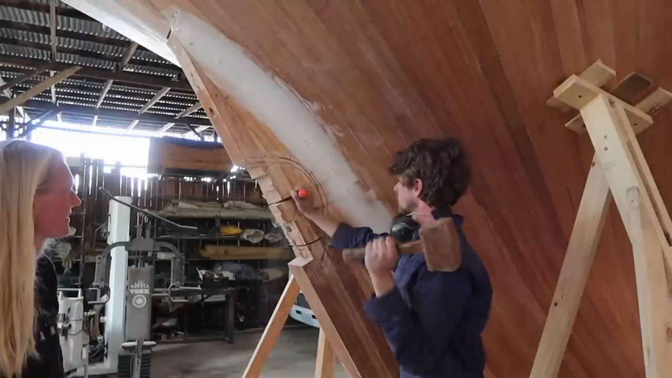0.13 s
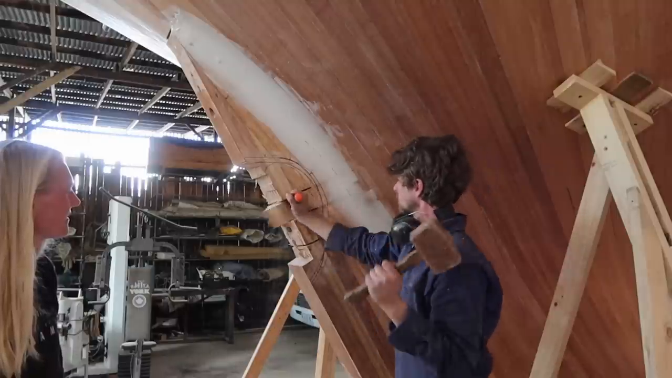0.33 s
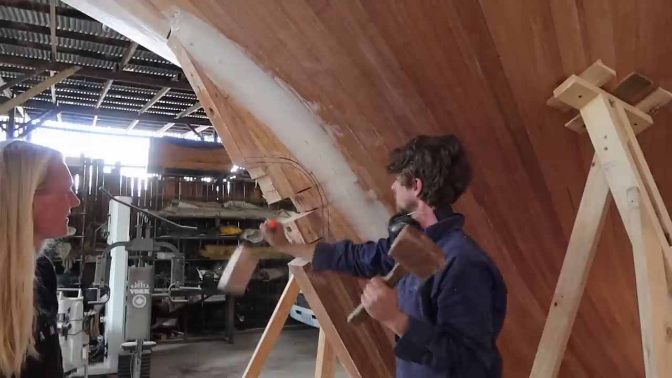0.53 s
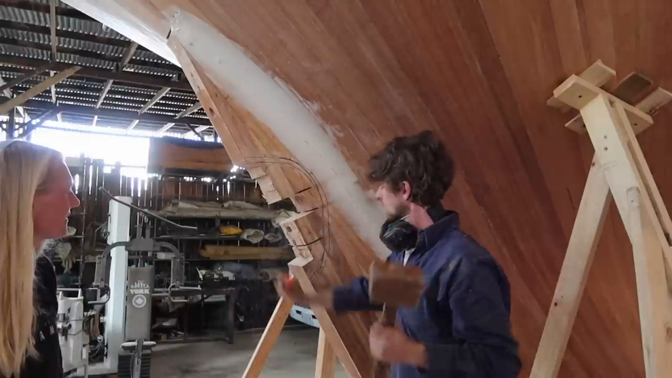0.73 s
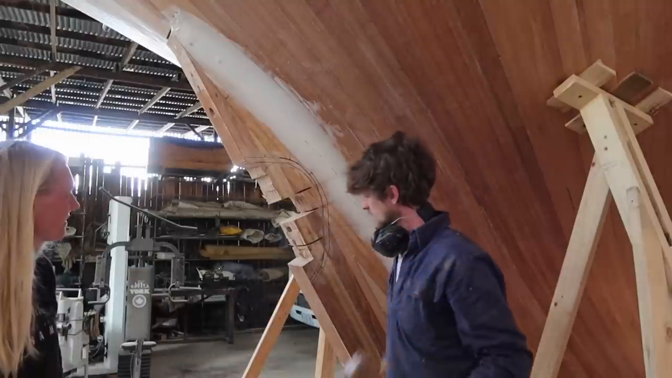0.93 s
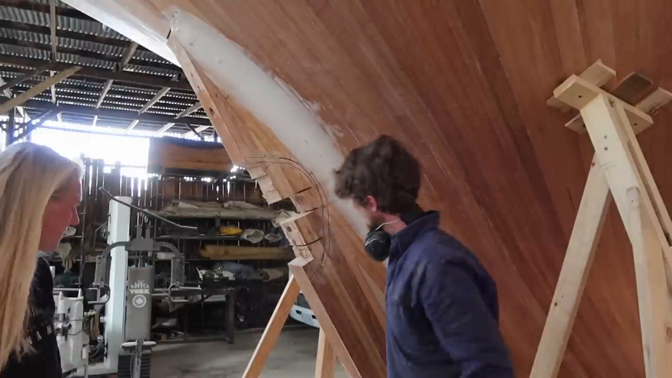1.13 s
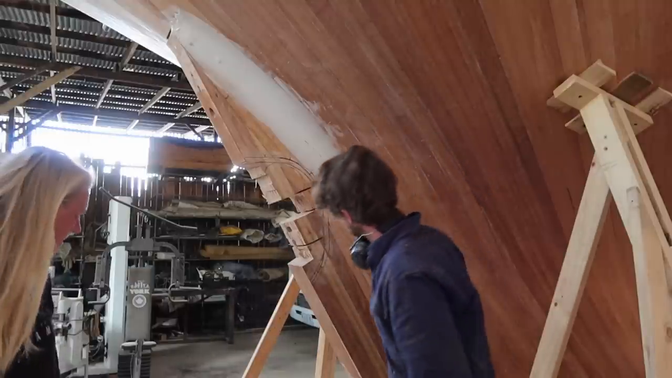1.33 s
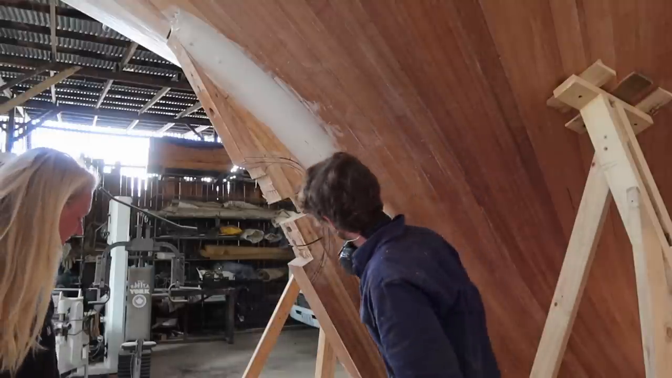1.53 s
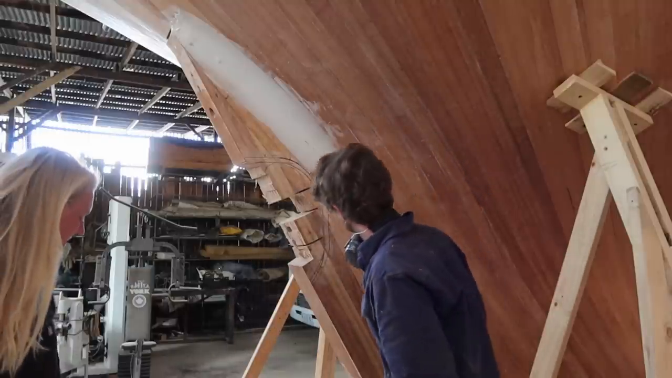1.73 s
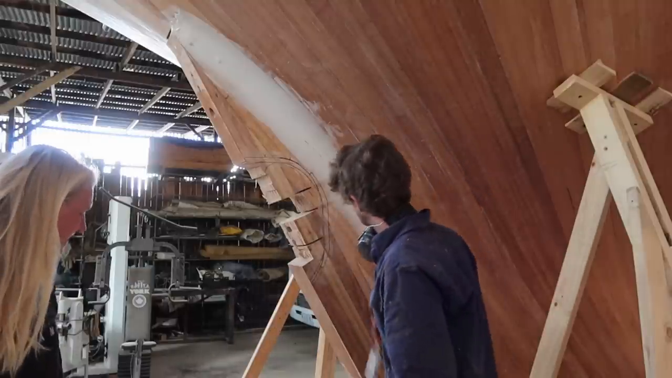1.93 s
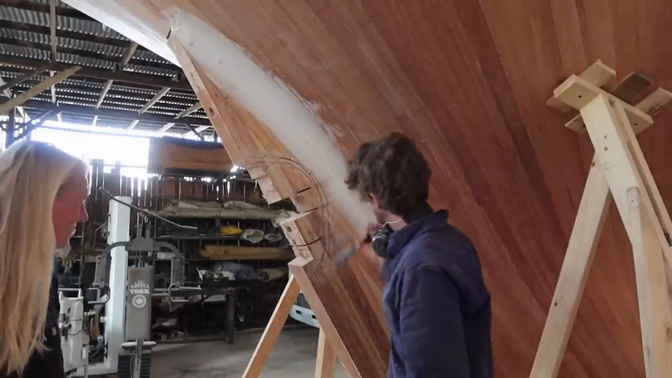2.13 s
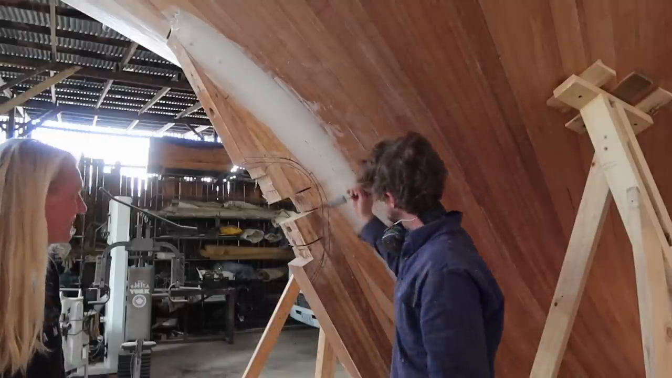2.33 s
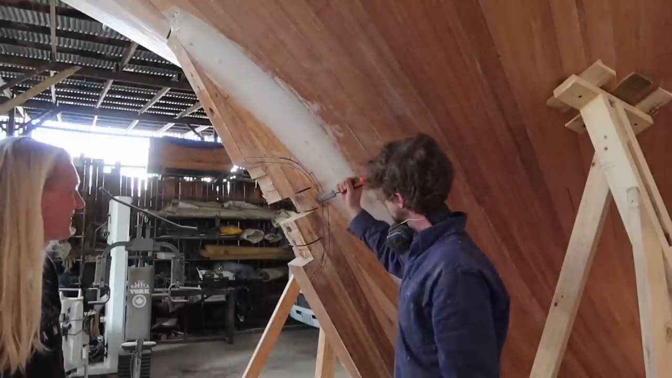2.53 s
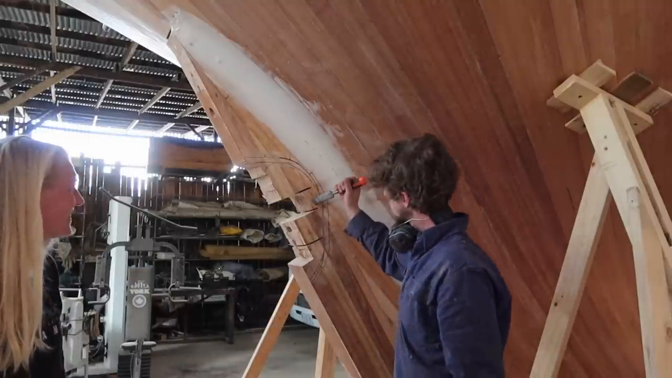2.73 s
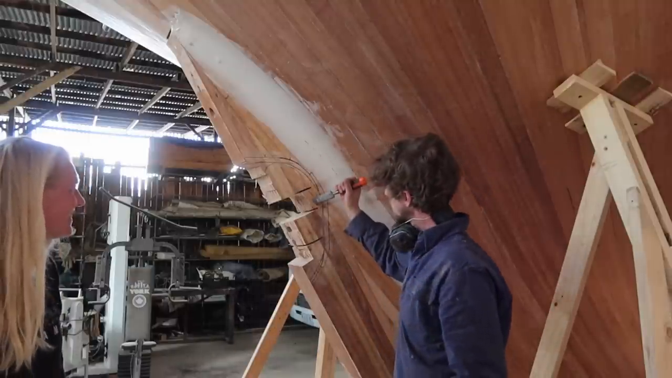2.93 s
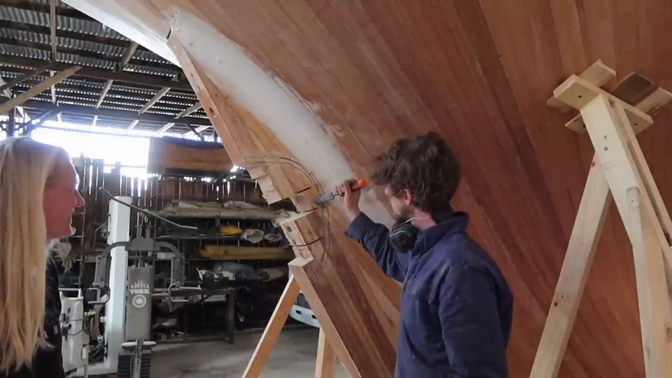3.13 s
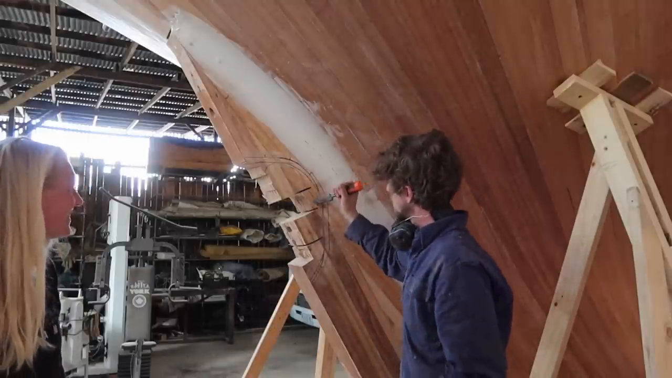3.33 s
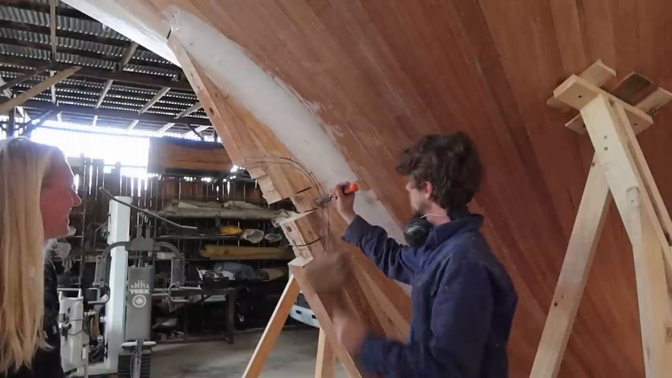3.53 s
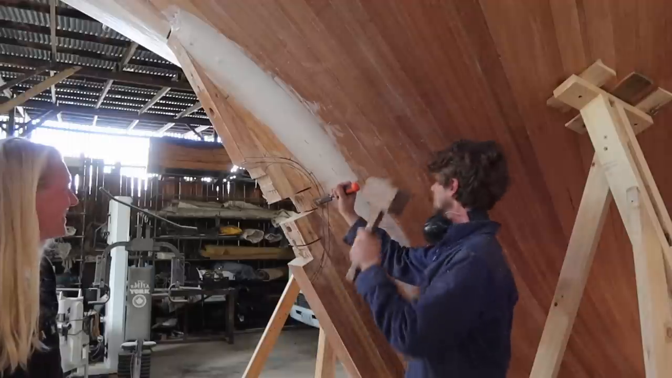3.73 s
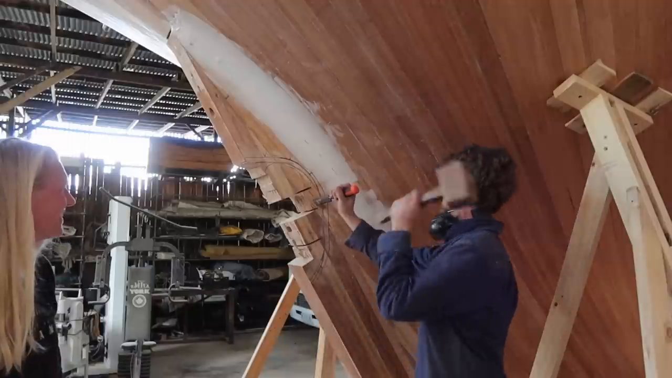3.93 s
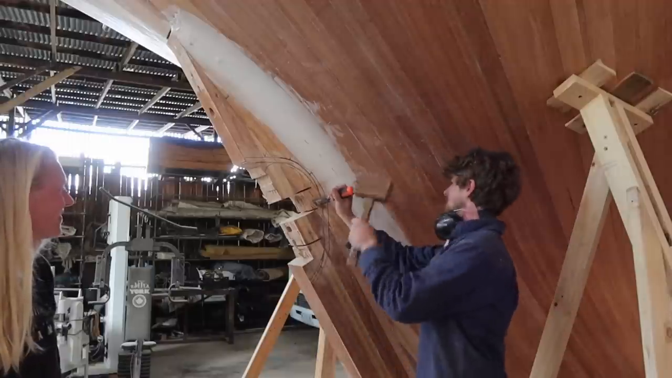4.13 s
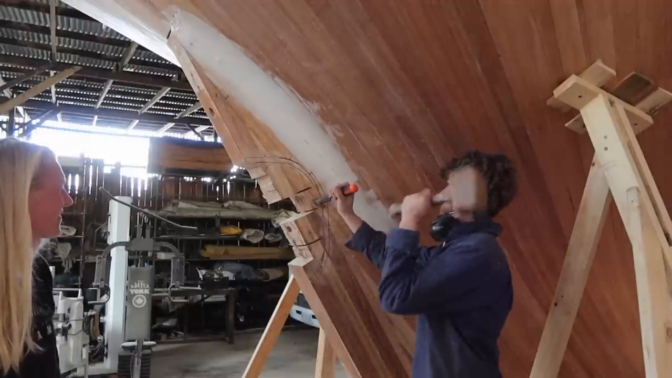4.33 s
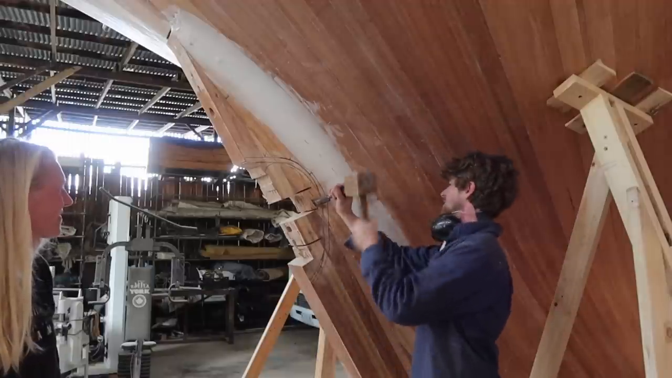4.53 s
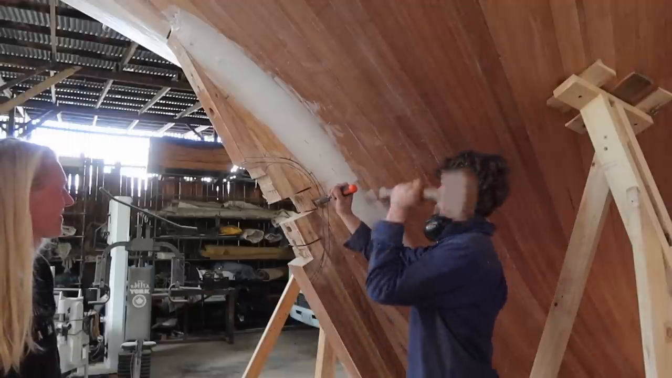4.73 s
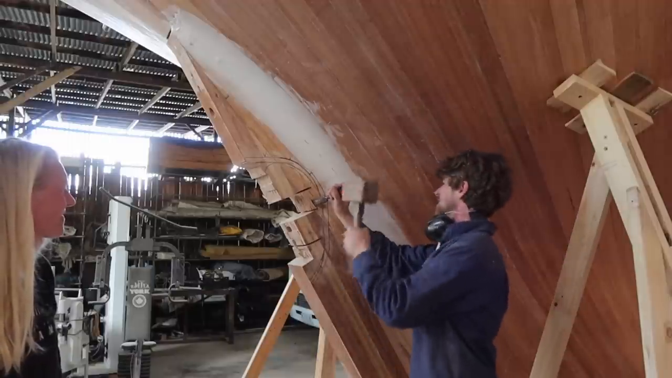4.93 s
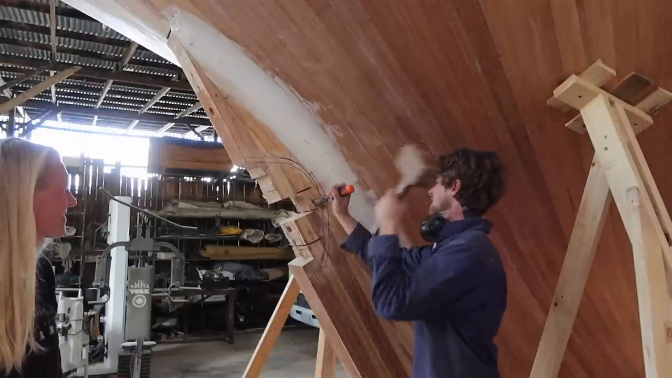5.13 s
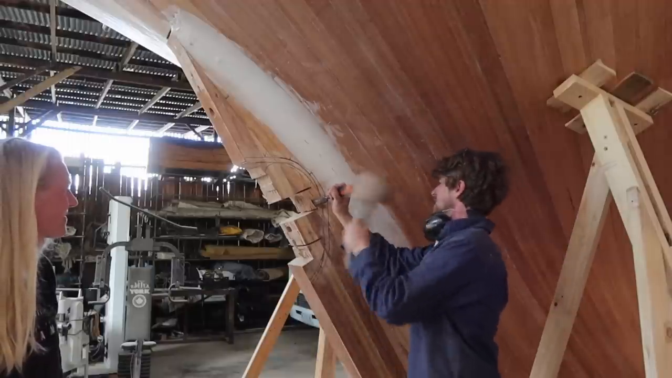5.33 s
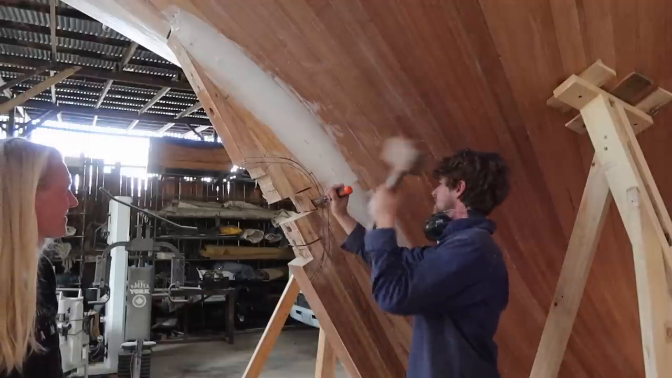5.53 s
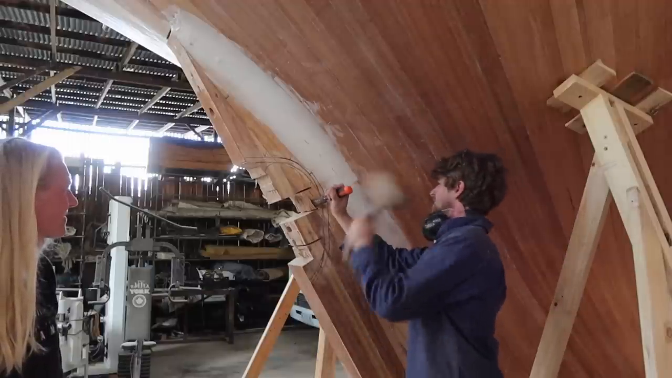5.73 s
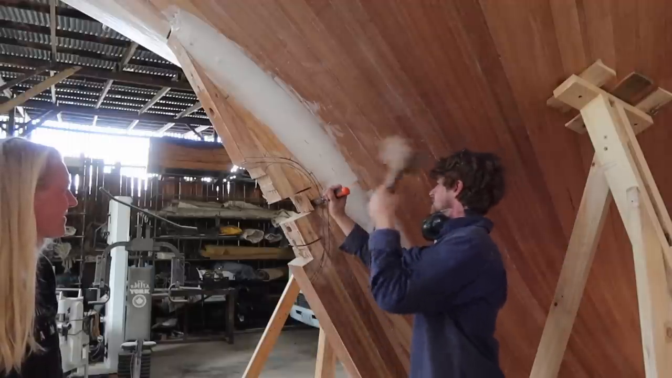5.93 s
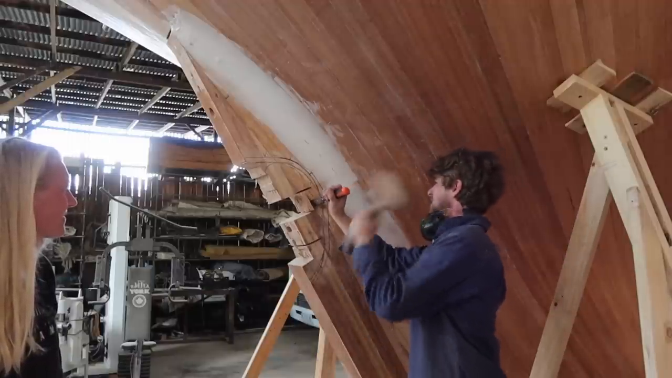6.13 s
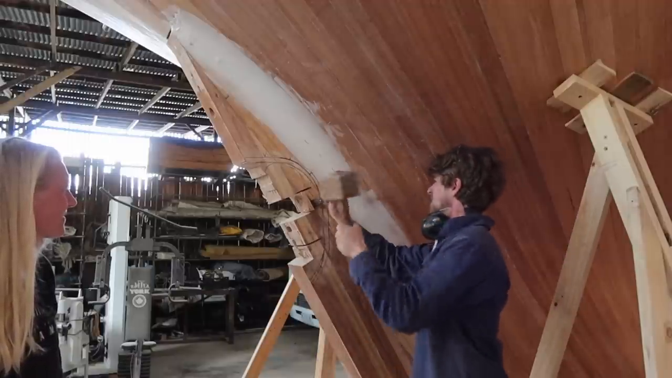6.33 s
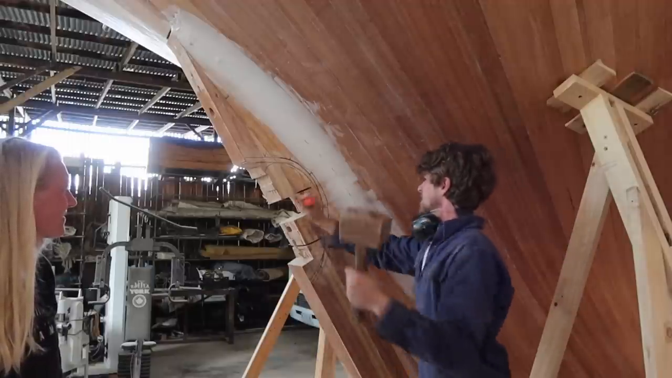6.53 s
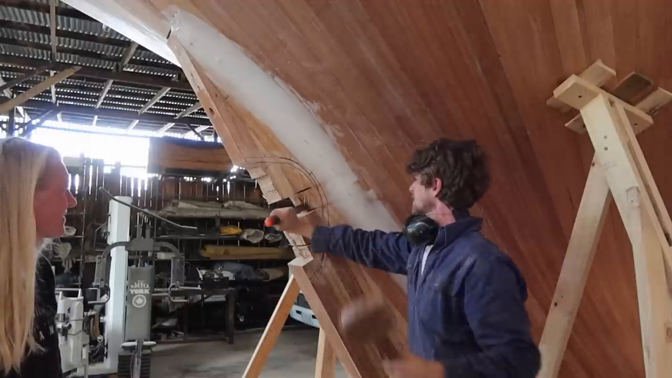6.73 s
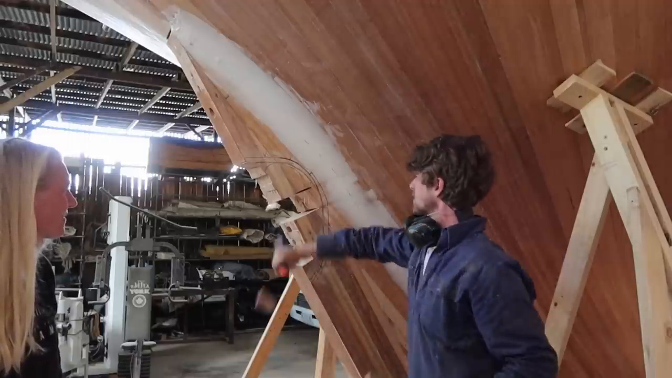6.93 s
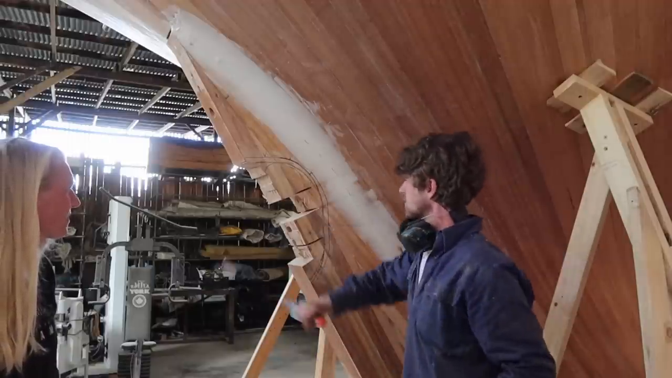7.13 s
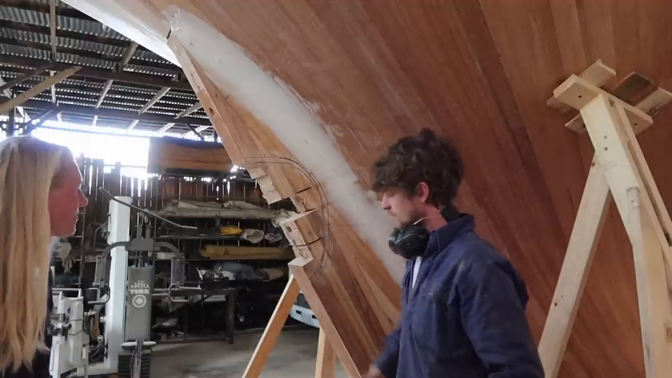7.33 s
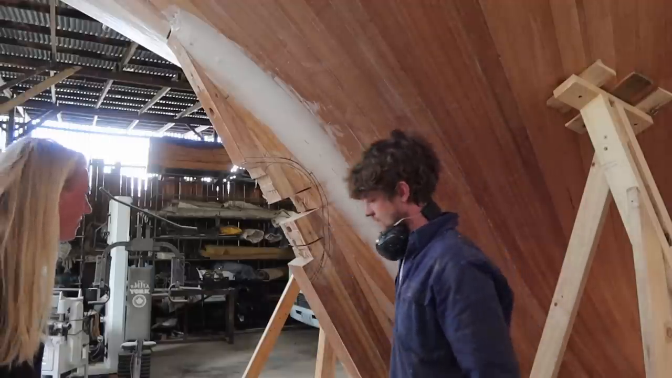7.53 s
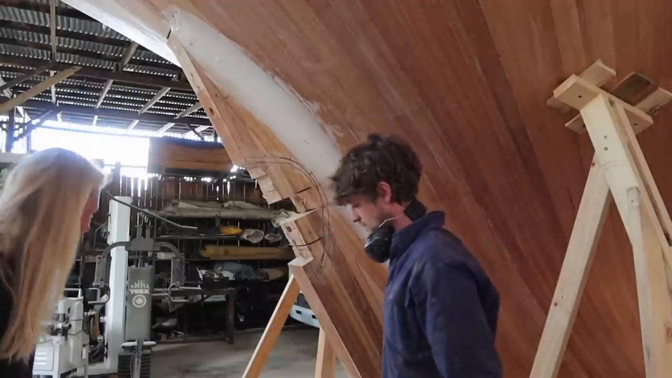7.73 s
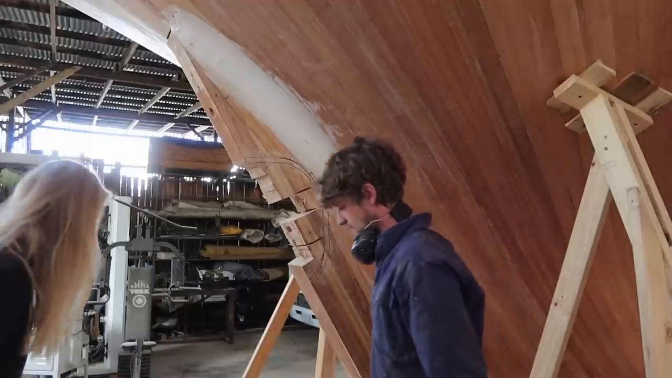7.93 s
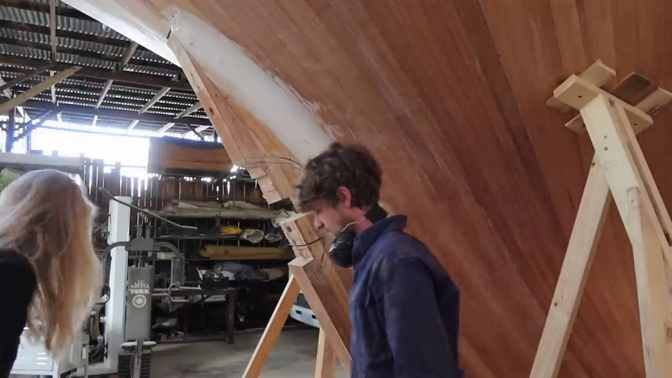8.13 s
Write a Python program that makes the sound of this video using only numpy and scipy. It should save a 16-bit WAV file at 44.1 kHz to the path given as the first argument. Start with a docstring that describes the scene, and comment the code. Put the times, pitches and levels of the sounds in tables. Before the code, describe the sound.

In a large shed, close to the work, a hollow boom from an earlier mallet blow fades while wood fibres crackle and snap. A block clacks hard on the floor and bounces. A quiet pause holds faint cloth rustle and small tool taps. Then six steady mallet blows on a chisel crack sharply and make the wooden hull boom. More waste splinters off, strikes a timber prop with a hollow clonk and drops to the floor.

```python
"""Mallet and chisel in a boat shed

A large shed, microphone near the work: a mallet drives a chisel into a timber on a boat's hull.
The tail of one blow comes first; a waste block is prised off and bounces on the floor. After a pause six
blows make the hull boom, and more waste is levered out and falls. Wood rings as damped modes; crunch, tearing,
cloth and air are shaped noise. The recorder's limiter ducks at each blow, so the boom swells up behind the crack."""
import sys
import numpy as np
from scipy import signal
from scipy.fft import rfft, irfft
from scipy.io import wavfile
from scipy.ndimage import uniform_filter1d, minimum_filter1d

SR = 44100
rng = np.random.default_rng(int(sys.argv[2]) if len(sys.argv) > 2 else 0)


def inscribe(sig):
    """Save sig as 16-bit PCM at rate SR to the path in sys.argv[1].

    A 1-D sig is mono; a 2-D sig holds one channel per row.
    Samples are clipped to [-1, 1] before scaling.
    """
    pcm = np.round(np.clip(np.atleast_2d(sig).T, -1, 1) * 32767)
    wavfile.write(sys.argv[1], SR, pcm.astype(np.int16))


N = 365280
TAIL, HIT = 65536, 16384   # lengths of a long ring and of a short contact [samples]
BASS_CUT_HZ, THUD_CUT_HZ = 74, 30   # small pieces, and soft contacts, radiate little below these


def from_db(db):
    """Amplitude of a level in dB."""
    return 10 ** (np.asarray(db) / 20)


def rms_one(x):
    """Scale a sound to rms 1."""
    return x / np.sqrt(np.mean(x ** 2) + 1e-20)


def in_time(rows):
    """A curve in time joined by straight lines."""
    return np.interp(np.arange(N) / SR, *np.transpose(rows))


def at_hz(points, hz):
    """A spectrum joined by straight lines over log frequency."""
    f, value = np.transpose(points)
    return np.interp(np.log(hz + 1e-9), np.log(f), value)


def bins(size):
    """Frequencies of a spectrum in Hz."""
    return np.fft.rfftfreq(size, 1 / SR)


def octaves(hz):
    """Octaves from 1 kHz, for tilting a spectrum; constant below 250 Hz."""
    return np.log2(np.maximum(hz, 250) / 1000)


def hump(hz, centre, width):
    """A resonance curve of height 1, with its width at half height."""
    return 1 / (1 + (2 * (hz - centre) / width) ** 2)


def add(out, s, sound):
    """Mix a sound in at a time; whatever lies before the start or past the end is lost."""
    at = round(s * SR)
    first, last = max(at, 0), min(at + sound.shape[-1], N)
    out[:, first:last] += sound[..., first - at:last - at]


def bass_cut(x, hz):
    """Second-order high-pass."""
    return signal.sosfilt(signal.butter(2, hz, "high", fs=SR, output="sos"), x + 1e-18)


# stereo width at the microphone, before a sound's own widening: [f/Hz, side minus mid level/dB]
WIDTH = [(60, -63), (200, -28.5), (600, -23.5), (1300, -18), (2400, -16.5), (4400, -4.5), (8000, 0),
         (15000, 4)]


def stereo_noise(white, colour_db, width=WIDTH, wider_db=0):
    """Two white noises become coloured mid and side, then left and right at rms 1."""
    size = white.shape[-1]
    mid, side = rfft(white) * from_db(colour_db)
    side = side * from_db(at_hz(width, bins(size)) + wider_db)
    return rms_one(irfft(np.array([mid + side, mid - side]), size))


def die_away(noise, t60s):
    """Each octave of a noise decays at its own rate."""
    t = np.arange(TAIL) / SR
    spectrum, out = rfft(noise), 0
    centres = np.geomspace(60, 15360, 9)
    for hz, corner in zip(centres, np.eye(len(centres))):
        # overlapping octave bands that add up to the whole
        band = at_hz(np.c_[centres, corner], bins(TAIL))
        out = out + irfft(spectrum * band) * from_db(-60 * t / at_hz(t60s, hz))
    return out


def burst(colour, rise, t60, tilt_db=0, wider_db=-2):
    """A brief noise of wood on wood: rises in `rise` s, near rms 1, and decays; tilt in dB per octave."""
    t, hz = np.arange(HIT) / SR, bins(HIT)
    shape = np.minimum(t / rise, 1) * from_db(-60 * np.maximum(t - rise, 0) / t60)
    colour_db = at_hz(colour, hz) + tilt_db * octaves(hz)
    noise = stereo_noise(rng.standard_normal((2, HIT)), colour_db, WIDTH, wider_db)
    return rms_one(noise * shape) * np.sqrt(np.mean(shape ** 2))


def struck(modes, pitch=1, scatter_db=1.5, size=HIT):
    """Damped modes, each excited a little differently by every contact."""
    t = np.arange(size) / SR
    hz, db, t60 = np.transpose(modes)[:, :, None]
    sign = (-1) ** np.arange(len(modes))[:, None]
    strength = sign * from_db(db + scatter_db * rng.standard_normal(db.shape))
    ringing = np.sin(2 * np.pi * hz * pitch * t) * from_db(-60 * t / t60)
    return np.sum(strength * ringing, axis=0)


# modes of a small piece of wood: [f/pitch, level/dB, relative t60]
CHIP = [(.62, -20, 0.024), (0.998, 3.5, 0.056), (1.45, -3.5, 0.0055), (2.08, -17, 0.024)]


def chip(hz, t60):
    """A small piece of wood rings at a pitch; its longest mode lasts t60."""
    longest = max(mode_t60 for *_, mode_t60 in CHIP)
    return struck(np.array(CHIP) * [1, 1, t60 / longest], hz)


def stroke(s, hold, rise_db_per_s, fall_db_per_s):
    """The gain of one movement: it swells up to time s, holds and fades."""
    t = np.arange(N) / SR
    rise_db = (t - s) * rise_db_per_s
    fall_db = (s + hold - t) * fall_db_per_s
    return from_db(np.clip(np.minimum(rise_db, fall_db), -200, 0))


# colour of the shed's air: [f/Hz, level/dB per Hz]
AIR = [(15, -28), (25, -1), (120, -2.5), (394, -10), (451, -6.5), (545, -15), (962, -20.5), (1230, -17),
       (2410, -20), (6380, -28.5), (12500, -37.5), (14800, -47), (16000, -58)]
# its level through time: [t/s, level/dB]
AIR_DB = [(0, -63.5), (.9, -56), (1.9, -55), (2.8, -49.5), (4.1, -48), (4.3, -54), (8.28, -53.5)]
# its stereo width: [f/Hz, side minus mid level/dB]
AIR_WIDTH = [(60, -27), (110, -10.5), (200, -4), (380, 0), (700, -1.5), (1290, -3.5), (2380, -4),
             (4400, -5.5), (8120, -3.5), (15000, -5)]


def shed_air():
    """The shed's background is wide coloured noise at a slowly varying level."""
    noise = stereo_noise(rng.standard_normal((2, N)), at_hz(AIR, bins(N)), AIR_WIDTH)
    return from_db(in_time(AIR_DB)) * noise


# mallet blows, also played by the hull: [t/s, force level/dB, deep level/dB, boom level/dB, thock level/dB,
# knock level/dB, hull tilt/dB per octave, low ring f/Hz, high ring f/Hz, node f/Hz, second node f/Hz]
BLOWS = [(-0.26, -4.5, -3, 4, 6.5, 5.5, 0.8, 1040, 1240, 1830, 915),
         (4.2213, 4, 0.5, 13.5, 0, 4.5, -0.68, 890, 1275, 2090, 1170),
         (4.6106, 2, 1.5, -3.5, 0.5, 6.5, -0.05, 1000, 2060, 1080, 1440),
         (4.9906, 1, -0.5, 0.5, -7, 8.5, -1, 1095, 1930, 1680, 910),
         (5.4542, -2, 1.5, -0.5, 2.5, 1.5, 0, 1740, 1990, 1050, 2220),
         (5.8683, -2, 1.5, -3, 3, -5, -0.25, 1326, 2020, 1870, 1090),
         (6.279, -4, -9, 10, -3.5, 7.5, 1.15, 1100, 2130, 1160, 1690)]
# modes of chisel and handle: [f/Hz, level/dB, t60/s]
CHISEL = [(412, -6, 0.023), (878, -7.5, 0.024), (1118, -5, 0.038), (1664, -5, 0.025), (2124, -14.5, 0.039),
          (3290, -8, 0.022), (4100, -14, 0.0093), (6600, -8.5, 0.0047)]
# fibres crushed by the edge, before tilt: [f/Hz, level/dB per Hz]
CRUSH = [(150, -2), (900, 6), (3500, 8), (5000, -3.5), (10000, -11), (15000, -27)]


def chisel(bite_delay=0.001303, tap_db=-8, bite_db=0, crush_db=-5, split_db=-7):
    """The mallet taps the handle; a moment later the edge bites, splits the grain and crushes the fibres."""
    out = np.zeros((2, N))
    for s, db, *_ in BLOWS:
        split = burst(CRUSH, rise=0.0001, t60=0.013, tilt_db=6.0, wider_db=-7)
        crush = burst(CRUSH, rise=0.0016, t60=0.022, tilt_db=-0.5)
        add(out, s, from_db(db + tap_db) * struck(CHISEL))
        add(out, s + bite_delay, from_db(db + bite_db) * struck(CHISEL))
        add(out, s + bite_delay, from_db(db + split_db) * split)
        add(out, s, from_db(db + crush_db) * crush)
    return out


# the hull's dense ringing: [f/Hz, level/dB per Hz]
HULL = [(30, -24), (60, -9), (100, -17.5), (170, -2.5), (225, -9), (300, 0.5), (450, -2), (680, -6),
        (1200, -9.5), (2100, -11.5), (2700, -16), (3800, -20.5), (6000, -26), (9000, -36), (12000, -41),
        (15000, -54)]
# its strongest resonances and gaps: [f/Hz, width/Hz, level/dB]
HULL_PEAKS = [(530, 80, 3.5), (636, 30, -11), (775, 44, 1.5), (1274, 55, 3), (1600, 106, 5.5),
              (1652, 71, -14.5), (2680, 150, -0.5), (2960, 80, 6.5), (3460, 210, 6.5), (4170, 140, 5)]
# its decay: [f/Hz, t60/s]
HULL_T60 = [(60, 1.9), (150, 1.23), (500, 0.84), (1500, 1.197), (3000, 0.91), (6000, 0.57), (14000, 0.3)]
# long-ringing plank modes; close neighbours beat, so the boom swells and throbs: [f/Hz, level/dB, t60/s]
PLANKS = [(81.1, -23, 1.8), (86, -19, 0.74), (98, -13, 0.64), (114.3, -20, 0.95), (118.3, -14, 1.03),
          (130.4, -21, 1.83), (145.2, -9, 0.57), (147.5, -12.5, 0.6), (152.4, -15, 0.95), (169, -17, 0.71),
          (188.9, -17.5, 0.82), (192.5, -16.5, 0.58), (233, -18, 0.51), (318, -25, 0.45),
          (537.5, -14.5, 0.68), (717, -23, 0.96), (816, -17, 0.69), (1117, -25.5, 0.88), (1306, -27, 0.69),
          (1467, -22, .9), (2170, -31, 0.55)]
HULL_DB = -13   # the hull's share of a blow's force
DEEP_EDGE_HZ = 178   # the deep modes of the whole hull end here
BOOM_HZ, BOOM_WIDTH_HZ = 205, 72   # the plank behind the cut booms
THOCK_HZ, THOCK_WIDTH_HZ = 353, 230   # the hollow middle of a blow
KNOCK_HZ, KNOCK_WIDTH_HZ = 540, 184   # the timber under the edge
# each place of the edge wakes two resonances of the timber and misses two
RING_DB, RING_WIDTH_HZ, NODE_DB, NODE_WIDTH_HZ = 5.5, 130, -8.5, 35


def hull(change=0.93, uneven_db=1.0, planks_db=4.0):
    """Countless plank modes ring on as decaying noise and damped modes; part of their mix shifts each blow."""
    out, hz = np.zeros((2, N)), bins(TAIL)
    body_db = at_hz(HULL, hz) + sum(db * hump(hz, f, width) for f, width, db in HULL_PEAKS)
    deep = 1 / (1 + (hz / DEEP_EDGE_HZ) ** 20)
    common = rng.standard_normal((2, TAIL))
    # the blow takes a moment to cross the planking
    spread = 1 - np.exp(-np.arange(TAIL) / SR / 0.0031)
    for s, db, deep_db, boom_db, thock_db, knock_db, tilt_db, low_hz, high_hz, node_hz, node2_hz in BLOWS:
        drive_db = deep_db * deep + boom_db * hump(hz, BOOM_HZ, BOOM_WIDTH_HZ)
        drive_db = drive_db + thock_db * hump(hz, THOCK_HZ, THOCK_WIDTH_HZ)
        drive_db = drive_db + knock_db * hump(hz, KNOCK_HZ, KNOCK_WIDTH_HZ)
        rings = hump(hz, low_hz, RING_WIDTH_HZ) + hump(hz, high_hz, RING_WIDTH_HZ)
        nodes = hump(hz, node_hz, NODE_WIDTH_HZ) + hump(hz, node2_hz, NODE_WIDTH_HZ)
        cut_db = RING_DB * rings + NODE_DB * nodes
        uneven = np.interp(hz, np.geomspace(600, 9000, 70), rng.standard_normal(70), left=0)
        colour_db = body_db + drive_db + cut_db + uneven_db * uneven + tilt_db * octaves(hz)
        white = common + change * rng.standard_normal((2, TAIL))
        dense = die_away(stereo_noise(white, colour_db), HULL_T60)
        modes = [(f, mode_db + np.interp(f, hz, drive_db), t60) for f, mode_db, t60 in PLANKS]
        planks = from_db(planks_db) * struck(modes, scatter_db=1.0, size=TAIL)
        add(out, s, from_db(db + HULL_DB) * spread * (dense + planks))
    return out


# colour of the shed's reverberation: [f/Hz, level/dB]
SHED = [(60, -4), (250, 1), (1000, -2.5), (3000, -4), (6000, 3.5), (10000, -8.5), (15000, -8)]
# its decay: [f/Hz, t60/s]
SHED_T60 = [(60, 0.86), (300, 0.58), (1200, 0.85), (3000, 0.63), (6000, 0.41), (14000, 0.25)]


def shed(x, build_up=0.0016):
    """Diffuse reverberation that builds up and dies away, the high treble soonest."""
    noise = stereo_noise(rng.standard_normal((2, TAIL)), at_hz(SHED, bins(TAIL)))
    echo = die_away(noise, SHED_T60) * (1 - np.exp(-np.arange(TAIL) / SR / build_up))
    echo = rms_one(echo) / np.sqrt(TAIL)   # a left and right of unit energy on average
    return signal.fftconvolve(x.mean(axis=0)[None], echo, axes=1)[:, :N]


# splinters snapping off: [t/s, level/dB, chip pitch f/Hz, tilt/dB per octave]
SNAPS = [(0.096, -42.5, 3020, 5), (0.1277, -31, 2200, 3), (0.1677, -38, 2930, 0), (0.357, -49, 2700, 0),
         (0.3866, -30, 2740, 3.5), (0.398, -34, 3970, 5), (0.409, -27.5, 3360, 3), (0.429, -36, 3560, 4),
         (0.602, -26, 3470, 4.5), (1.481, -45, 3670, 9), (6.540, -45, 3530, 5), (6.5536, -38, 3200, 2),
         (6.566, -37, 3470, 0), (6.578, -38, 3300, 3), (6.6203, -32, 3300, 2), (6.6418, -31, 3240, 2),
         (6.671, -42, 3300, 6), (6.713, -45, 3300, 7), (6.78, -25.5, 2380, 2), (6.7926, -48.5, 3300, 5.5),
         (6.806, -40, 2340, 0), (6.8705, -45, 2970, 7), (6.9142, -34.5, 2600, 4), (6.918, -23, 2040, 4),
         (6.928, -26.5, 2070, 1.5)]
# breaking wood, before tilt; also heard in levering, block corners and the prop: [f/Hz, level/dB per Hz]
SNAP = [(60, -64), (200, 11), (900, 1.5), (1700, 6), (2800, 10), (5000, -6), (8000, -6.5), (12000, -7),
        (14300, -19), (16000, -42)]
FRACTURE_DB, FRACTURE_T60_S = 0, 0.0032
TEAR_DB, TEAR_T60_S = -1.5, 0.022
CHIP_DB, CHIP_T60_S = -6, 0.014   # the snapped-off chip's ring


def splinters():
    """Each snap is a bright fracture and a short tear, and sets a small chip ringing."""
    out = np.zeros((2, N))
    for s, db, chip_hz, tilt_db in SNAPS:
        fracture = from_db(FRACTURE_DB) * burst(SNAP, rise=0.00027, t60=FRACTURE_T60_S, tilt_db=tilt_db - 2)
        tear = from_db(TEAR_DB) * burst(SNAP, rise=0.00052, t60=TEAR_T60_S, tilt_db=tilt_db)
        ring = from_db(CHIP_DB) * chip(chip_hz, CHIP_T60_S)
        add(out, s, from_db(db) * (fracture + tear + ring))
    return out


# the chisel levers the waste: [full strain t/s, hold t/s, level/dB, tilt/dB per octave]
PRIES = [(0.1, 0.068, -66, 10), (0.401, 0.026, -35.5, -4.5), (6.565, 0.16, -52, 0.5),
         (6.76, 0.16, -68, 9.5)]
PRY_RISE_DB_PER_S, PRY_FALL_DB_PER_S = 700, 328
# fine tearing, and small cracks that stand out of it
FIBRES_PER_S, CRACKS_PER_S, CRACK_DB = 1200, 32, 19.5


def tearing(size_db=13.0, fibre_s=0.00011):
    """While the chisel levers, fibres crackle and now and then a thicker one cracks, at random moments."""
    out = np.zeros((2, N))
    size = from_db(size_db * np.minimum(rng.exponential(1, N), 2))
    fibres = (rng.random(N) < FIBRES_PER_S / SR) * size
    decaying = signal.lfilter([1], [1, -np.exp(-1 / (fibre_s * SR))], fibres + 1e-18)
    crackle = rms_one(np.tanh(decaying))
    breaks = (rng.random(N) < CRACKS_PER_S / SR) * (2 * rng.random(N) - 1)
    hz = bins(TAIL)
    for s, hold, db, tilt_db in PRIES:
        strain = from_db(db) * stroke(s, hold, PRY_RISE_DB_PER_S, PRY_FALL_DB_PER_S)
        grain = stereo_noise(rng.standard_normal((2, TAIL)), at_hz(SNAP, hz) + tilt_db * octaves(hz))
        grain = grain[:, np.arange(N) % TAIL]
        crack = burst(SNAP, rise=0.00018, t60=0.0041, tilt_db=tilt_db)
        cracks = signal.oaconvolve((breaks * strain)[None], crack, axes=1)[:, :N]
        out += strain * crackle * grain + from_db(CRACK_DB) * cracks
    return out


# light taps of tools and loose chips on wood: [t/s, level/dB, pitch f/Hz, ring t60/s, room send level/dB]
TAPS = [(0.4088, -29.5, 3290, 0.015, -9.5), (0.5487, -44, 3700, 0.012, -15),
        (1.459, -39.5, 2580, 0.028, -2), (3.596, -31.5, 2000, 0.012, -10), (3.603, -32, 2300, 0.022, -5),
        (3.606, -40, 4080, 0.015, 0.5), (3.609, -30, 3060, 0.022, -3), (3.631, -39.5, 3450, .012, -3),
        (3.7400, -31.5, 1680, 0.0076, -7.5), (3.7451, -34, 2480, 0.0063, -6),
        (7.566, -27.5, 2720, 0.0051, -7), (7.570, -31, 1500, 0.0046, -9),
        (7.6205, -29.5, 2066, 0.044, -1.5), (7.647, -37, 3500, .008, -1), (7.724, -36, 3570, 0.0062, -3.5),
        (7.7618, -35, 2930, 0.008, -5), (7.8512, -25, 1590, 0.011, -2.5), (7.863, -37, 2200, .008, -2),
        (7.931, -41, 1800, 0.011, -6), (8.0397, -35.5, 1355, 0.019, -2), (8.0425, -37.5, 2270, .012, 1.5)]
# colour of their scuff, before tilt: [f/Hz, level/dB per Hz]
SCUFF = [(150, -29), (600, -1.5), (1500, 7), (2900, 6), (4500, -16.5), (8000, -14), (15000, -32)]
TAP_RING_DB, TAP_SCUFF = 4.5, 2.05   # the scuff of a tap lasts this many times its ring
# pieces pitched above this scuff brighter, by so many dB per octave for each octave
SCUFF_HZ, SCUFF_TILT_DB = 2180, 5


def taps():
    """A small piece rings and scuffs; the longer its ring, the longer its scuff. Gives direct and room send."""
    direct, send = np.zeros((2, 2, N))
    for s, db, hz, t60, room_db in TAPS:
        ring = from_db(TAP_RING_DB) * chip(hz, t60)
        tilt_db = SCUFF_TILT_DB * np.log2(hz / SCUFF_HZ)
        scuff = burst(SCUFF, rise=0.0015, t60=TAP_SCUFF * t60, tilt_db=tilt_db)
        tap = bass_cut(from_db(db) * (scuff + ring), BASS_CUT_HZ)
        add(direct, s, tap)
        add(send, s, from_db(room_db) * tap)
    return direct, send


# dull bumps on the hull and the floor: [t/s, level/dB, pitch ratio, tilt/dB per octave]
BUMPS = [(0.413, -33, 1.78, 2), (0.451, -21.5, 0.93, 0), (0.47, -32.5, 1.13, 1), (1.05, -41, 0.61, -8),
         (1.23, -37, 0.56, 1), (2.535, -48.5, 1.57, 2), (2.76, -33, 1.14, -9.5), (2.783, -43, 1.17, -4),
         (3.596, -40.5, 1.16, 1.5), (3.791, -45, 2.3, -3), (3.991, -45, 1.3, 0), (6.919, -45, 2.4, 6),
         (6.941, -40, 2.18, 6), (7.772, -41, 2.4, 0)]
# their low modes, before pitch and tilt: [f/Hz, level/dB, t60/s]
BUMP = [(98.8, -4.5, 0.075), (195, 4, 0.036), (259, 0.5, 0.02), (355, -4.5, 0.067), (514, -10.5, 0.063)]


def bumps():
    """Soft contacts wake only the low modes; a tilt above the strongest mode makes each duller or brighter."""
    out = np.zeros((2, N))
    main_hz = max(BUMP, key=lambda mode: mode[1])[0]
    for s, db, pitch, tilt_db in BUMPS:
        modes = []
        for hz, mode_db, t60 in BUMP:
            octaves_above = np.log2(np.maximum(hz / main_hz, 1))
            modes.append((hz, mode_db + tilt_db * octaves_above, t60))
        add(out, s, from_db(db) * struck(modes, pitch))
    return out


# waste blocks landing and bouncing: [t/s, level/dB, pitch ratio, clack level/dB, corner tick level/dB,
# clack tilt/dB per octave, room send level/dB]
DROPS = [(0.9997, -5.5, 0.98, -5, 1, 1.5, -3.5), (1.0489, -14, 0.9, -2, -1, 6.5, -1.5),
         (1.1765, -41, 1.3, 8, -10, 1, -5), (1.2280, -19.5, 0.92, 3.5, -11, 1, -2.5),
         (1.39, -31.5, 0.61, 4.5, 1.5, 1.2, -2), (1.508, -25.5, 0.97, 4, -7, -2, -5.5),
         (7.361, -12.5, 1.094, 1, -31, 0.5, -3), (7.8318, -31, 1.7, 4, -15, -2.5, -5.5)]
# modes of a block, before the landing's pitch ratio: [f/Hz, level/dB, t60/s]
BLOCK = [(242, -4, 0.015), (272, -4, 0.037), (438, -1.5, 0.057), (483, 0, 0.026), (496, -0.5, 0.065),
         (580, -5, 0.026), (656, -4, 0.041), (984, -4.5, 0.0098), (1140, -7, 0.016), (1320, 2.5, 0.0034),
         (1790, -14.5, 0.0074), (2000, -11.5, 0.011), (2680, -13, 0.006)]
# wood clacking on a hard surface, before tilt; also heard at the prop: [f/Hz, level/dB per Hz]
CLACK = [(40, -35), (130, -20), (230, -11.5), (450, 5.5), (900, -0.5), (2000, 5.5), (3000, -6), (5500, -20),
         (9000, -29), (13000, -41), (16000, -60)]
# after landing a block chatters: first tick, mean gap, loss per tick
RATTLE_DB, RATTLE_GAP_S, RATTLE_LOSS_DB = -9, 0.009, 1.5


def falling_blocks(rock_delay=0.00313, corner_db=-5):
    """Waste wood ticks down on a corner, clacks flat, chatters and rings briefly, at a pitch set by how it lands.
    Gives the direct sound and what reaches the room."""
    direct, send = np.zeros((2, 2, N))
    for s, db, pitch, clack_db, tick_db, tilt_db, room_db in DROPS:
        corner_tick = burst(SNAP, rise=0.0007, t60=0.013, tilt_db=-2.0, wider_db=1)
        corner_clack = burst(CLACK, rise=0.00044, t60=0.01, tilt_db=tilt_db)
        flat_clack = burst(CLACK, rise=rock_delay, t60=0.05, tilt_db=tilt_db - 2.5)
        contacts = [(0, tick_db, corner_tick),
                    (0, clack_db + corner_db, corner_clack),
                    (0, clack_db - 2.5, flat_clack),
                    (rock_delay / 2, 3.5, struck(BLOCK, pitch))]
        gaps = RATTLE_GAP_S * (.5 + rng.random(size=5))
        for k, delay in enumerate(np.cumsum(gaps)):
            tick = burst(CLACK, rise=0.00021, t60=0.0068, tilt_db=tilt_db + 1.0)
            contacts.append((delay, clack_db + RATTLE_DB - RATTLE_LOSS_DB * k, tick))
        for delay, contact_db, sound in contacts:
            add(direct, s + delay, from_db(db + contact_db) * sound)
            add(send, s + delay, from_db(db + contact_db + room_db) * sound)
    return bass_cut(direct, BASS_CUT_HZ), bass_cut(send, BASS_CUT_HZ)


# a sleeve rustles as the chisel is raised: [full t/s, hold t/s, level/dB]
SLEEVE = (2.59, 0.16, -57.5)
# colour of the cloth: [f/Hz, level/dB per Hz]
CLOTH = [(300, -24), (1200, -6), (2500, 0), (4000, -13), (8000, -22), (15000, -35)]


def sleeve():
    """Cloth slides softly over cloth: coloured noise swells and fades."""
    s, hold, db = SLEEVE
    rub = stereo_noise(rng.standard_normal((2, N)), at_hz(CLOTH, bins(N)))
    return from_db(db) * stroke(s, hold, rise_db_per_s=160, fall_db_per_s=70) * rub


# a falling piece strikes the prop: [t/s, level/dB]
PROP_HITS = [(6.9640, -14.5), (6.979, -31.5)]
# modes of the prop: [f/Hz, level/dB, t60/s]
PROP = [(173, -15, 0.073), (335, -17, 0.018), (470, -17, 0.032), (690, -13, 0.096), (820, -5, 0.048),
        (944, -7.5, 0.059), (1020, -2.5, 0.054), (1074, -3.5, 0.072), (1215, -1.5, 0.026),
        (1490, -11, 0.016), (1690, -7, 0.015), (2060, -19, 0.011), (3760, -28, .015)]


def prop():
    """A loose piece ticks against the prop, which rings with a hollow note."""
    out = np.zeros((2, N))
    for s, db in PROP_HITS:
        tick = from_db(-19) * burst(SNAP, rise=0.0019, t60=0.037, tilt_db=-8)
        clack = from_db(-4.5) * burst(CLACK, rise=0.002, t60=0.024, tilt_db=-8.5)
        add(out, s, from_db(db) * (struck(PROP) + tick + clack))
    return out


def scene():
    """All sources reach the microphone; falling wood sends more to the shed than the work at the chisel."""
    blows = chisel()
    chips = splinters() + tearing()
    ticks, tick_send = taps()
    thuds = bass_cut(bumps(), THUD_CUT_HZ)
    blocks, block_send = falling_blocks()
    clonk = bass_cut(prop(), BASS_CUT_HZ)
    send = from_db(-16.5) * blows + from_db(-7) * chips + tick_send
    send = send + from_db(2.5) * thuds + block_send + from_db(1.5) * clonk
    direct = blows + hull() + chips + ticks + thuds + blocks + sleeve() + clonk
    return direct + shed(send) + shed_air()


def limiter(x, threshold_db=-12.0, release_db_per_s=115, hold=0.042):
    """The gain drops just ahead of a loud sound, holds, then climbs back steadily."""
    power = uniform_filter1d(np.mean(x ** 2, axis=0), size=176)   # 4 ms mean
    over_db = np.maximum(10 * np.log10(np.maximum(power, 1e-12)) - threshold_db, 0)
    t = np.arange(N) / SR
    # the reduction follows each peak and shrinks in a straight line
    falling = np.maximum.accumulate(over_db + release_db_per_s * t) - release_db_per_s * t
    span = 2 * int(hold * SR / 2) + 1
    held = -minimum_filter1d(-falling, span, origin=span // 2)
    ahead = np.interp(t + 0.00044, t, held)
    return x * from_db(-uniform_filter1d(ahead, size=44))


def record(dry):
    """The recorder's limiter, then a steep cut of everything above 16 kHz."""
    top_cut = signal.ellip(10, .1, 90, 16000, fs=SR, output="sos")
    return signal.sosfilt(top_cut, limiter(dry))


dry = scene()
out = record(dry)
inscribe(out)
```